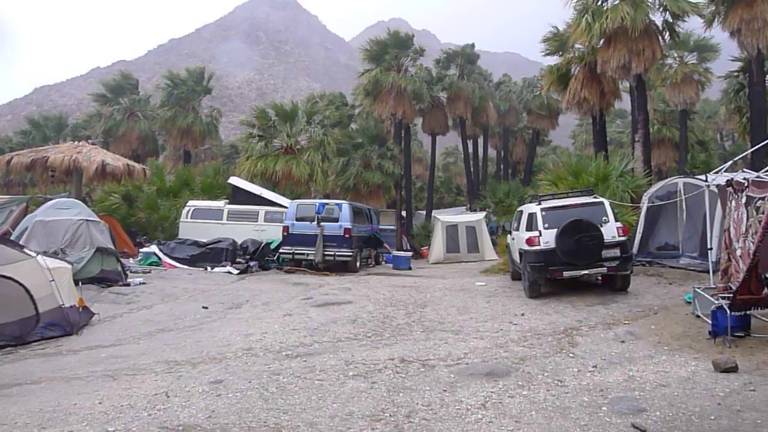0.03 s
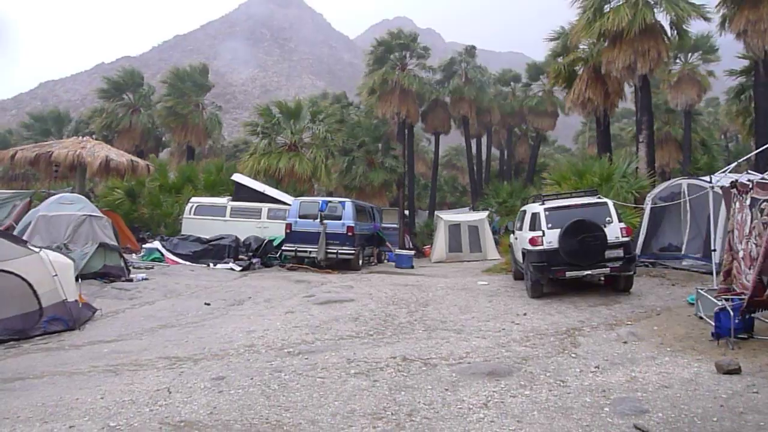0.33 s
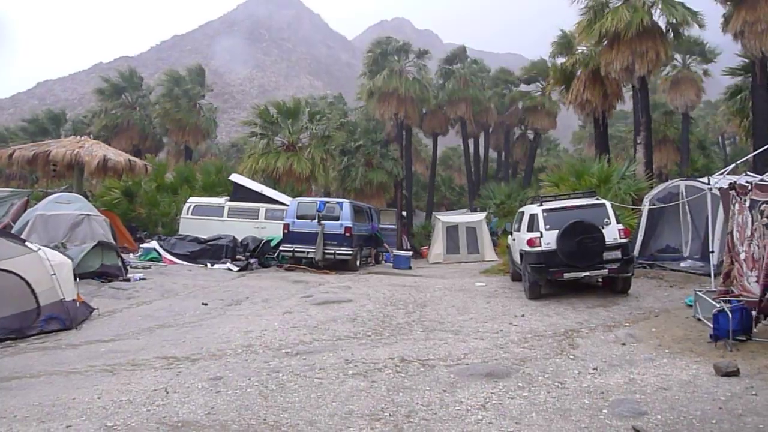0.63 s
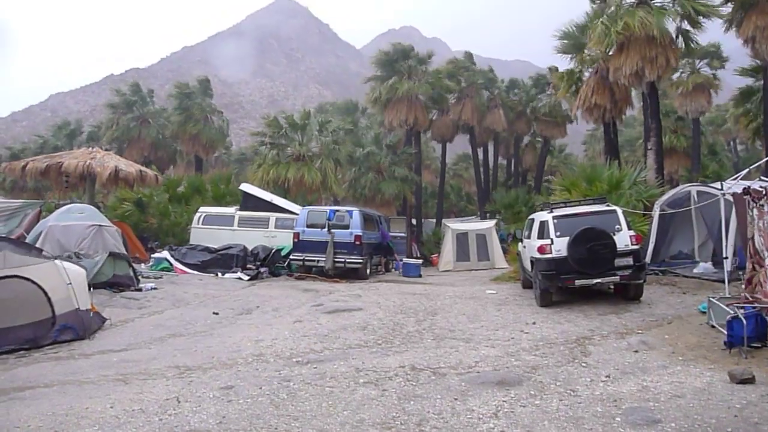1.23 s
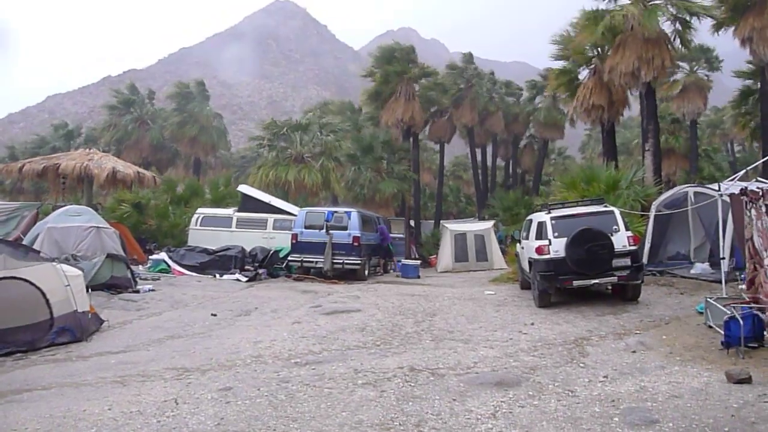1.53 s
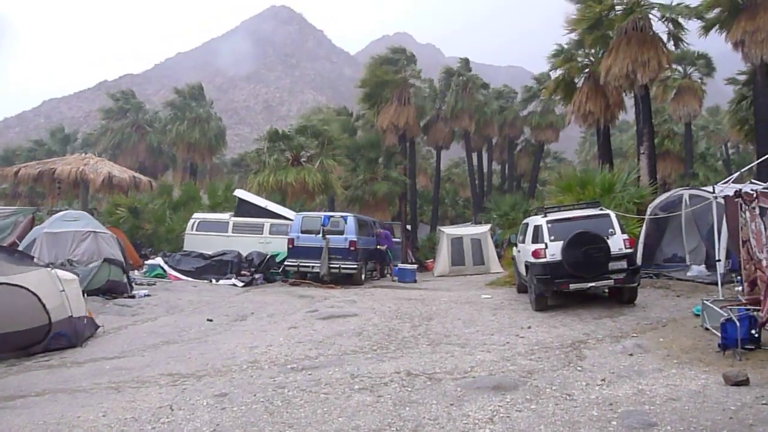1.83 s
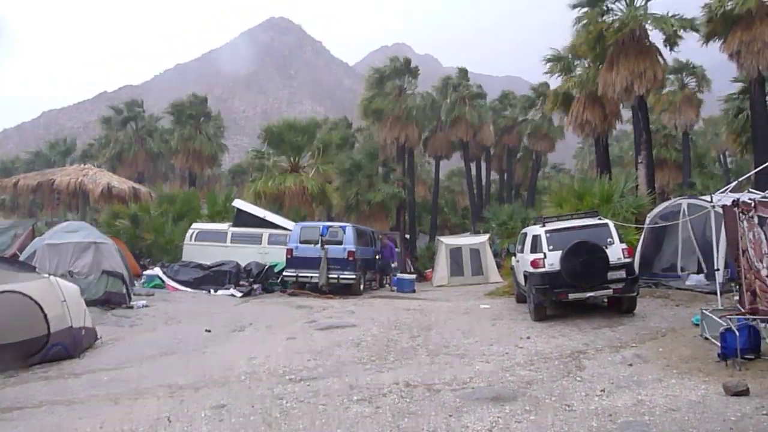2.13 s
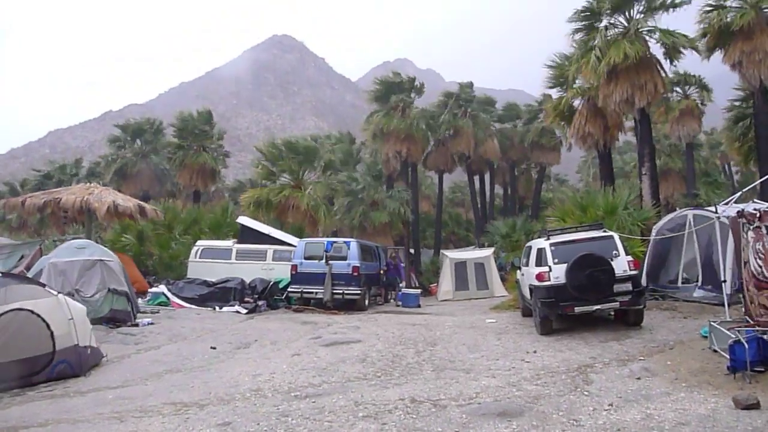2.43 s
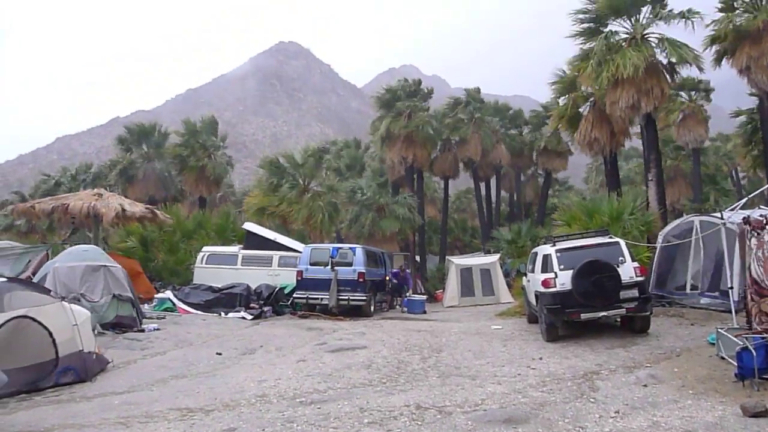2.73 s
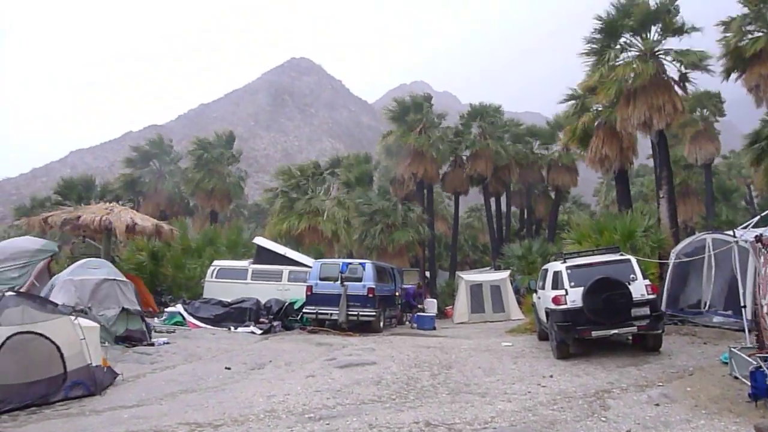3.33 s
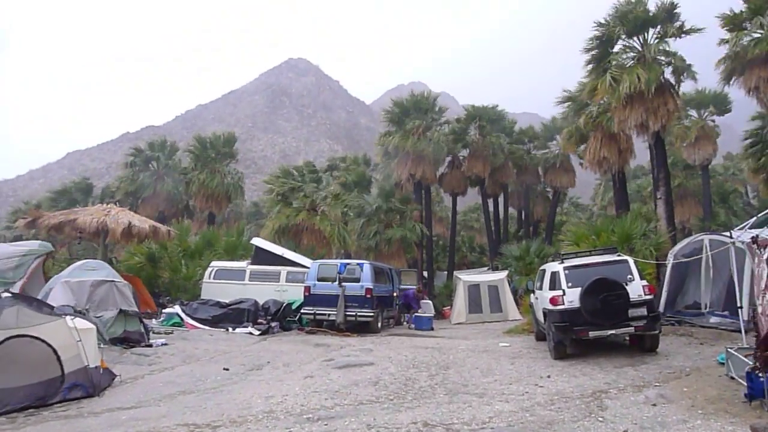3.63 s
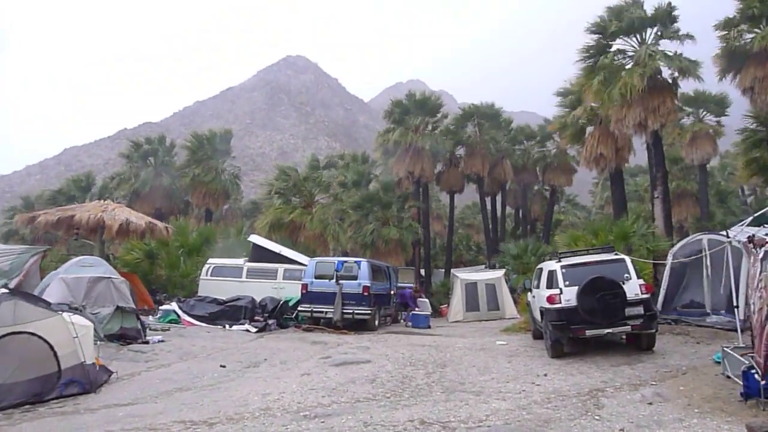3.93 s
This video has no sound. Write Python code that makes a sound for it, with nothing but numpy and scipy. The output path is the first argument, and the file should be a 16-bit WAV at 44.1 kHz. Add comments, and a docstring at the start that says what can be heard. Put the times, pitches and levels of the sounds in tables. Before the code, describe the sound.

Gusty wind rushes through palm trees and buffets the microphone with low thumps.

```python
"""Storm wind at a campsite. First comes the broad rush of tossing palms, with the fine rattle of their
leaves. Air also hits the microphone: swirls (eddies) make a rumble, single thumps and short fluttering
buffets. From about 1 s the rumble eases and the rush swells. From about 2 to 3 s the buffeting is strong
and the rush sinks. In the last second the rush swells back."""
import sys
import numpy as np
from scipy import signal
from scipy.fft import rfft, irfft
from scipy.io import wavfile

SR = 44100
rng = np.random.default_rng(int(sys.argv[2]) if len(sys.argv) > 2 else 0)


def store_pcm(level_fs):
    """Save levels as 16-bit WAV."""
    pcm = np.round(np.clip(level_fs, -1, 1) * 32767).astype(np.int16)
    wavfile.write(sys.argv[1], SR, np.atleast_2d(pcm).T)


N = 176400  # 4 seconds

# Level of the rush and leaf rattle as heard, before the roar is added; it dips when air buffets
# the microphone. Each row: time in seconds, level in dB.
RUSH_LEVEL = [(.04, -32), (.08, -35.5), (.15, -32), (.21, -26.5), (.28, -27), (.6, -24.5), (.7, -27.5),
              (.75, -29.5), (.83, -30.5), (.95, -25), (1.15, -25), (1.35, -23), (1.75, -23), (1.88, -22.3),
              (1.93, -27), (2.02, -25.5), (2.22, -35.5), (2.31, -31), (2.37, -33.5), (2.41, -37.5),
              (2.56, -36), (2.63, -28.5), (2.76, -28.5), (2.8, -33), (2.85, -29.5), (3.2, -26), (3.58, -24),
              (3.7, -25), (4.0, -23.5)]
# The tone of the rush. Each row: frequency in Hz, relative strength in dB.
RUSH_TONE = [(30, -25), (80, -12.5), (150, -2), (290, -0.5), (400, -4), (680, -3.5), (1100, -5.5),
             (1600, -6), (2400, -6.5), (4000, -10), (5800, -13.5), (6900, -20)]
# The hollow roar within the rush. Each row: time in seconds, boost in dB.
ROAR_BOOST = [(0, 3), (.3, 2.5), (.6, 3.5), (1, 2), (1.5, 2), (1.85, 3), (2.3, 4), (2.8, 3.5), (3.3, 2.5),
              (3.6, 2.5), (4, 2.5)]
# The tone of the rattling leaves. Each row: frequency in Hz, relative strength in dB.
RATTLE_TONE = [(500, -22), (1500, 4), (3000, 3), (6500, -6.5)]
# How loud the rumble on the microphone is. Each row: time in seconds, level in dB.
RUMBLE_LEVEL = [(.04, -31), (.24, -29), (.5, -32), (.58, -28), (.68, -24.5), (.76, -31), (.86, -29.5),
                (.95, -45.5), (1.1, -33), (1.2, -39.5), (1.86, -42), (1.92, -25), (2.05, -29.5), (2.2, -27),
                (2.45, -28), (2.58, -32.5), (2.68, -25.5), (2.83, -33), (2.92, -28), (3, -33),
                (3.22, -30.5), (3.35, -40.5), (3.6, -30.5), (4, -39.5)]
# The tone of the rumble. Each row: frequency in Hz, relative strength in dB.
RUMBLE_TONE = [(20, -13), (40, -7.5), (68, -0.5), (130, -6.5), (250, -13.5), (500, -26), (1200, -40),
               (4000, -75.5)]
# Single eddies. Each row: time of the peak in seconds, peak level in dB, rough pitch in Hz.
THUMP_EVENTS = [(.06, -11, 100), (0.336, -15.5, 110), (.724, -8, 115), (.759, -15, 150), (.798, -11.5, 180),
                (1.145, -17, 150), (2.04, -18.5, 130), (2.086, -19, 130), (2.191, -12.5, 90),
                (2.315, -13, 120), (2.371, -6, 200), (2.398, -11.5, 120), (2.503, -14.5, 180),
                (2.782, -14, 160)]
# Short trains of eddies. Each row: middle in seconds, length in seconds, level in dB, rough pitch in Hz.
BUFFET_EVENTS = [(0.143, 0.033, -26, 100), (.238, 0.025, -28.5, 169), (.685, 0.03, -28, 142),
                 (1.063, 0.0098, -23.5, 130), (1.131, .026, -20.5, 130), (2.036, 0.014, -17.5, 127),
                 (2.087, 0.013, -22, 140), (2.122, .014, -28, 168), (2.355, 0.014, -17, 165),
                 (2.37, 0.0045, -24.5, 1130), (2.466, .02, -20.5, 133), (2.533, 0.018, -25.5, 380),
                 (2.689, 0.027, -19, 177), (2.779, .02, -15.5, 146), (2.872, 0.012, -17, 154),
                 (2.892, 0.013, -26, 180), (3.056, 0.026, -25.5, 140), (3.225, 0.019, -27, 95),
                 (3.554, 0.022, -24, 185), (3.601, 0.042, -24, 203), (3.994, 0.034, -24, 210)]
# How the highest sounds fall away. Each row: frequency in Hz, gain in dB.
TREBLE_GAIN = [(6900, 1.5), (7250, -4.5), (7600, -16), (8400, -28), (8900, -31)]


def gain(db):
    """Turn decibels into a number to multiply by."""
    return 10 ** (np.asarray(db) / 20)


def curve(rows):
    """Join rows of (seconds, value) with straight lines."""
    return np.interp(np.arange(N) / SR, *np.array(rows, float).T)


def unit(x):
    """Scale a signal so its average size (rms) is 1."""
    return x / np.sqrt(np.mean(x ** 2) + 1e-18)


def frequencies(size=N):
    """The frequencies in a spectrum, in Hz, never below 1."""
    return np.maximum(np.arange(size // 2 + 1) * SR / size, 1)


def with_tone(x, rows):
    """Filter a signal by rows of (Hz, dB), then scale it to size 1."""
    hz, db = np.array(rows, float).T
    tone_db = np.interp(np.log(frequencies()), np.log(hz), db)
    return unit(irfft(rfft(x) * gain(tone_db), N))


def drift(rate_hz):
    """A smooth random wobble of size 1; a higher rate wobbles faster."""
    smoothing = np.exp(-(2 * frequencies() / rate_hz) ** 2)
    return unit(irfft(rfft(rng.standard_normal(N)) * smoothing, N))


def palm_rush(bands=17, lowest_hz=40, roar_hz=664, roar_octaves=0.95):
    """Air pours through the palm tops: half-octave bands of noise swell together and flicker alone."""
    air = rfft(with_tone(rng.standard_normal(N), RUSH_TONE))
    band_position = np.clip(2 * np.log2(frequencies() / lowest_hz), 0, bands - 1)
    swell_db = 0.13 * drift(rate_hz=22)
    roar_db = curve(ROAR_BOOST)
    out = 0
    for k in range(bands):
        hz = lowest_hz * 2 ** (k / 2)
        band = irfft(air * np.maximum(1 - abs(band_position - k), 0), N)
        roar_share = np.exp(-.5 * (np.log2(hz / roar_hz) / roar_octaves) ** 2)
        flicker_db = 0.72 * drift(rate_hz=20)
        out += band * gain(swell_db + roar_share * roar_db + flicker_db)
    return out


def leaf_rattle(ticks_per_s=900, spread_db=2.5, decay_s=0.0017):
    """Stiff leaves tick against each other: many tiny bursts of noise, uneven in size."""
    hits = rng.random(N) < ticks_per_s / SR
    ticks = hits * gain(spread_db * np.minimum(rng.exponential(size=N), 5))
    power = signal.lfilter([1], [1, -np.exp(-1 / (decay_s * SR))], ticks ** 2)  # each tick dies away
    return with_tone(np.sqrt(power) * rng.standard_normal(N), RATTLE_TONE)


def wind_rumble():
    """Swirling air presses unevenly on the microphone."""
    low_noise = with_tone(rng.standard_normal(N), RUMBLE_TONE)
    gust_db = 2.5 * drift(rate_hz=130)
    return unit(low_noise * gain(gust_db)) * gain(curve(RUMBLE_LEVEL))


def eddy_thumps(edge_cycles=0.18):
    """A lone eddy passes: one sharp peak of pressure with a shallow dip on either side."""
    t = np.arange(N) / SR
    out = 0
    for peak_s, db, hz in THUMP_EVENTS:
        cycles = (t - peak_s) * hz
        away = (cycles / edge_cycles / 2) ** 2  # squared distance from the peak
        out += gain(db) * (1 - 3 * away) / (1 + away) ** 3
    return out


def wind_buffets(size=8192, steepness=1.97, double_width_hz=450):
    """A train of eddies passes: a brief swell of noise, pitched near the rate at which they go by."""
    out = np.zeros(N + 2 * size)  # spare room at both ends
    t = (np.arange(size) - size // 2) / SR
    f = frequencies(size)
    for middle_s, length_s, db, hz in BUFFET_EVENTS:
        # Faster eddies are more chaotic, so their band of noise is wider.
        width = 0.7 * (1 + min(hz / double_width_hz, 1) ** 2)
        band = (1 + ((f / hz - hz / f) / width) ** 2) ** (-steepness / 2)
        noise = irfft(rfft(rng.standard_normal(size)) * band)
        swell = np.exp(-2 * (t / length_s) ** 2)
        burst = unit(noise * swell) * np.sqrt(np.mean(swell ** 2))
        start = int(middle_s * SR) + size // 2
        out[start:start + size] += gain(db) * burst
    return out[size:size + N]


def scene(start_s=.036):
    """Palms all around, and wind on the microphone itself, after an instant of silence."""
    rush = (palm_rush() + gain(-7) * leaf_rattle()) * gain(curve(RUSH_LEVEL))
    mix = rush + wind_rumble() + eddy_thumps() + wind_buffets()
    return mix[None] * (np.arange(N) / SR > start_s)


def record(dry, low_cut_hz=35.6, top_hz=8900):
    """A small camera's microphone thins the deepest bass, and the treble falls away steeply."""
    hz, db = np.array(TREBLE_GAIN, float).T
    treble_db = np.interp(frequencies(2 * N), hz, db)
    dull = irfft(rfft(dry, 2 * N) * gain(treble_db))[:, :N]
    thin = signal.sosfilt(signal.butter(1, low_cut_hz, "high", fs=SR, output="sos"), dull)
    return signal.sosfilt(signal.ellip(12, .2, 90, top_hz, fs=SR, output="sos"), thin)


dry = scene()
out = record(dry)
store_pcm(out)
```